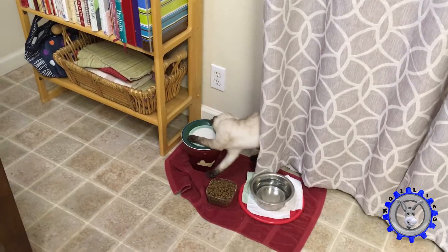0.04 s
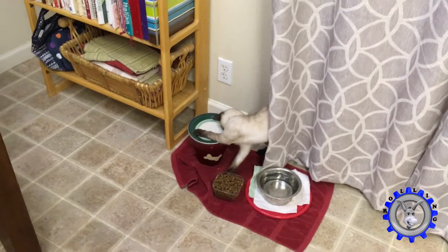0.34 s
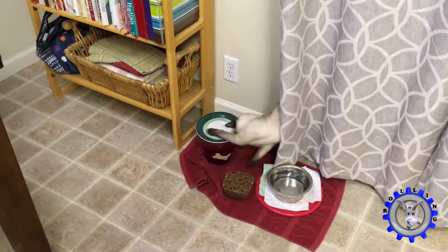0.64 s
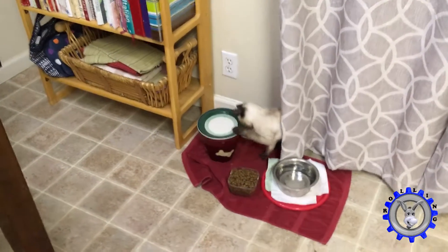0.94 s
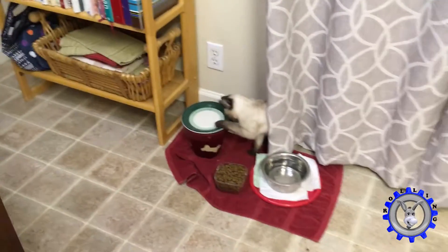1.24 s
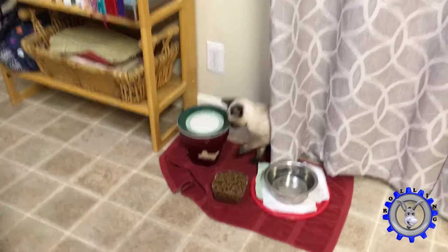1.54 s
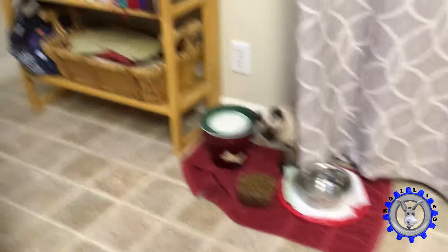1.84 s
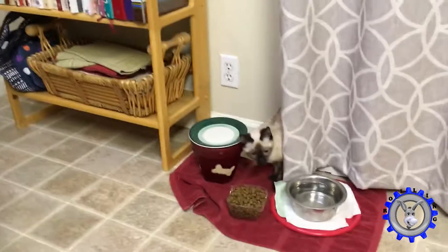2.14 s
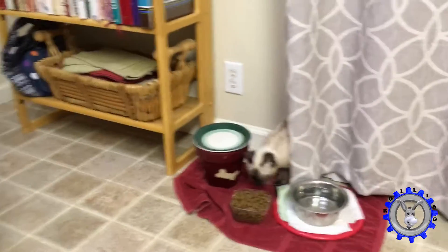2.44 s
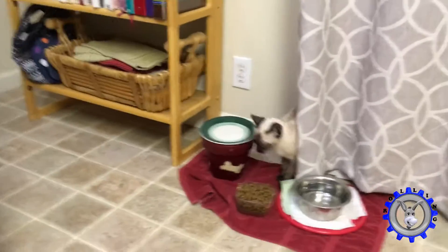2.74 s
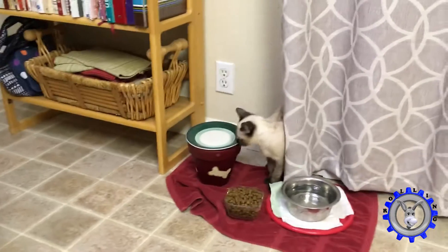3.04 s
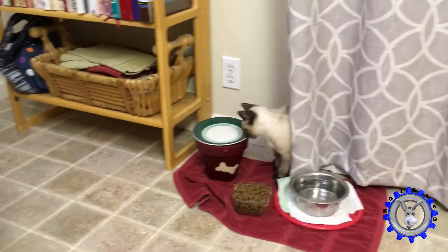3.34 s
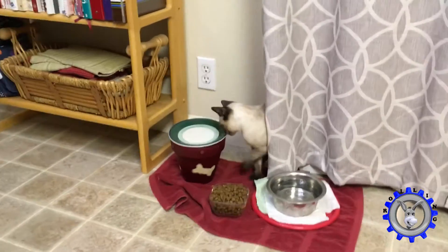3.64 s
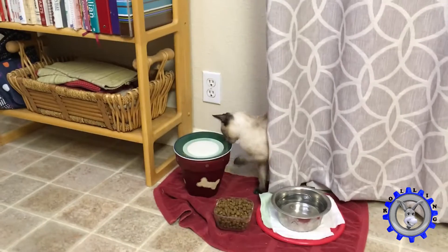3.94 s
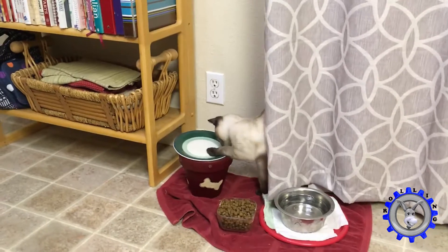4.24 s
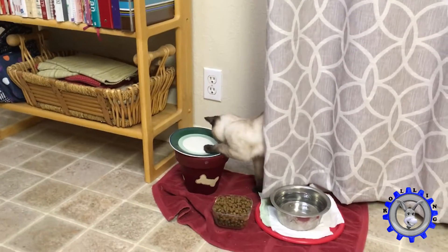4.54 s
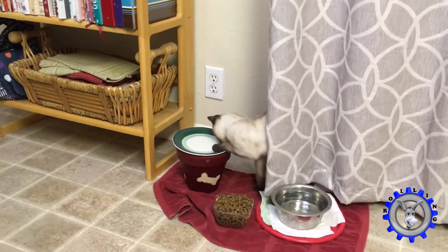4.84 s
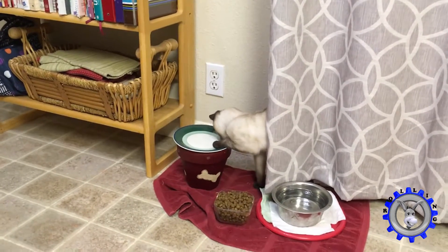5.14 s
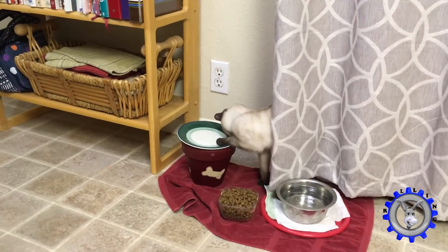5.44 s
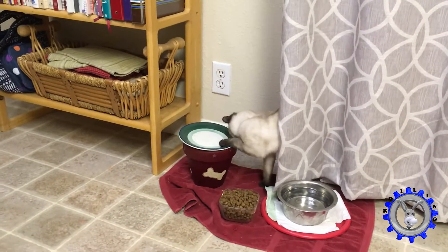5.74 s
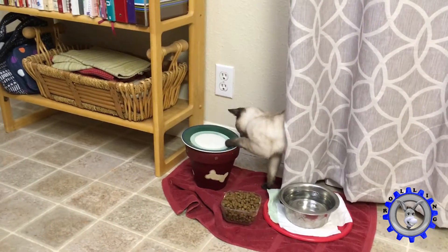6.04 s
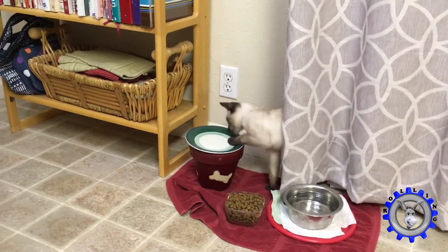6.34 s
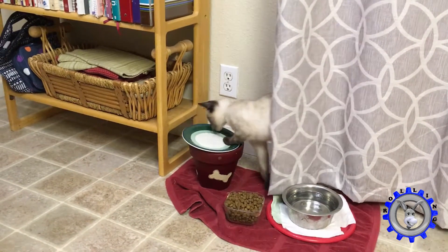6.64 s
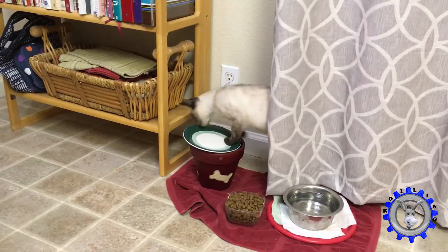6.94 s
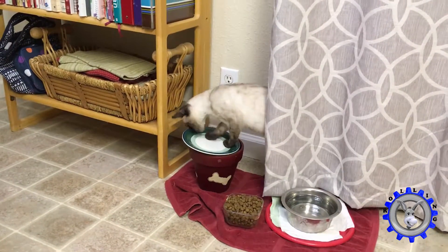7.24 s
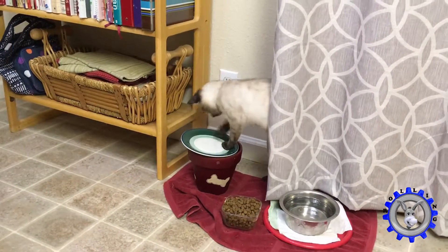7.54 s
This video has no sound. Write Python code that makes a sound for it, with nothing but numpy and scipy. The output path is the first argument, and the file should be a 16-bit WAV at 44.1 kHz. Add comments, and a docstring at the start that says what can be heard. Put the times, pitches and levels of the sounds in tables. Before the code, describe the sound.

In a small room with a hard floor, a motor hums low under a soft rush of air. Straight ahead of the microphone, a kitten nudges a lid against a metal pet bowl with muted taps, brief chatters and light ticks, while faint high squeaks come and go. Midway come two sharp, ringing clanks in quick succession, then further knocks, another clank near the end and a final gentle nudge.

```python
"""A small hard-floored room, the microphone facing a metal pet bowl on a mat. From the start a motor
throbs against the mains hum over a low rush of air and a soft rustle. A kitten paws at the loose lid,
which scuffs and chatters on the rim, with light dry ticks in between. Faint squeaks come and go from
about 2 s. At 4.4, 4.7 and 6.7 s the lid slips free and clangs on the rim, rocking the bowl and
wobbling to rest. One soft nudge follows near the end."""
import sys
import numpy as np
from scipy import signal
from scipy.fft import rfft, irfft, next_fast_len
from scipy.io import wavfile

SR = 44100
rng = np.random.default_rng(int(sys.argv[2]) if len(sys.argv) > 2 else 0)


def output_pcm(signal):
    """Save a mono or channel-first signal as 16-bit PCM at the path in sys.argv[1].

    Samples are clipped to [-1, 1] before scaling.
    """
    pcm = np.clip(np.atleast_2d(signal).T, -1, 1) * 32767
    wavfile.write(sys.argv[1], SR, np.round(pcm).astype(np.int16))


N = 343980
TIME = np.arange(N) / SR
RING_TIME = np.arange(SR // 2) / SR

# Low rush of air in the room. Each row: frequency in Hz, relative spectral level in dB.
RUSH_COLOUR = [(22, -32), (45, -8.5), (70, -4.5), (110, -0.5), (180, 0), (280, 0.5), (380, -4.5),
               (480, -6.5), (700, -18.5), (1200, -60.5)]
# Slow drift of the rush. Each row: time in seconds, level in dB.
RUSH_LEVEL = [(0, -49.5), (1.2, -51.5), (2, -51.5), (4, -53), (6, -51.5), (7.8, -53)]
# Thin hiss of the air. Each row: frequency in Hz, relative spectral level in dB.
HISS_COLOUR = [(290, -6), (500, -3), (1010, -3), (1070, -5), (3020, -17), (3340, -24), (5370, -21),
               (15600, -56)]
# Soft rustle. Each row: frequency in Hz, relative spectral level in dB.
RUSTLE_COLOUR = [(300, -8), (900, 8), (2000, 1), (4000, -1), (7000, -3.5), (10000, -6), (15500, -9)]
# The rustle is strongest as the kitten draws back behind the curtain, then steady.
# Each row: time in seconds, relative level in dB.
RUSTLE_LEVEL = [(0.0, -68.5), (0.42, -71), (0.78, -67), (1.27, -68), (1.68, -64), (2.22, -62.5),
                (2.43, -65.5), (4.2, -71)]
# Tones of the hum. Each row: frequency in Hz, level in dB.
HUM_TONES = [(59.1, -58), (75.1, -64), (137.94, -63), (150.2, -51), (165.98, -68), (240.02, -68),
             (257.92, -65), (262.78, -66), (300.44, -56)]
# The throb grows along the room's standing wave. Each row: time in seconds, motor level in dB.
THROB_LEVEL = [(0, -52), (1, -51), (1.5, -48), (2.5, -48), (3.5, -46), (7.8, -47)]
# The paw nudges the lid against the rim. Each row: start in seconds, strength in dB,
# chatter length in seconds, treble in dB, weight of the paw from 0 to 1.
NUDGES = [(.001, -23, .012, -8, 0.93), (.069, -28, .006, -9, 0.86), (.595, -37, 0.0057, -2, 1),
          (.829, -27.5, .0015, -24, 1), (1.591, -27.5, .0011, -33, 0.65), (2.200, -28.5, .0013, -13, 0.97),
          (3.305, -25.5, 0.0039, -19, 0.73), (3.322, -20, 0.012, -16, 0.77), (3.700, -33, 0.017, -6, 1),
          (4.284, -23, 0.0038, -17, 0.76), (4.367, -17.5, .002, -2.5, 0.9), (4.382, -10, .002, -1.5, 0.98),
          (4.39, -12.5, 0.0086, 3, 0.57), (4.660, -28.5, 0.022, 1, 0.8), (4.980, -31.5, .008, -20, 0.7),
          (5.534, -28, .04, -14, 0.8), (5.575, -22.5, 0.0076, -13, 0.62),
          (5.585, -11.5, .0026, -10.5, 0.83), (6.040, -19, .008, -18, 0.78), (6.05, -19, 0.0029, -30, .15),
          (6.062, -17, 0.0063, -16, 0.14), (6.265, -30, .015, -21, 0.86), (6.356, -28, .001, -23, 1),
          (6.556, -26.5, .015, -7, 1), (6.590, -21, .004, -9.5, 1), (6.677, -15, .008, -7.5, 0.93),
          (7.518, -33.5, .02, -16, 1)]
# The lid slips free and drops on the rim. Each row: start in seconds, strength in dB,
# chatter length in seconds, treble in dB, last wobble in dB below the drop.
DROPS = [(4.398, -.5, .007, -1.5, 19), (4.690, -4, .002, -1.5, 13), (6.6995, -6.5, .0016, 1.5, 31)]
# The clack, a crowd of quickly damped modes. Each row: frequency in Hz, relative spectral level in dB.
CLACK_COLOUR = [(50, -40), (150, -7), (350, -5.5), (600, -3.5), (800, -4), (1050, -9), (1400, -3.5),
                (1900, 0), (2850, -3), (3300, -4.5), (4100, -9.5), (4550, -1), (5000, -19.5), (6350, -0.5),
                (7100, -14), (8000, -19), (15500, -26)]
# Ring of lid and rim. Each row: frequency in Hz, relative level in dB, seconds to fall 60 dB.
LID_MODES = [(1229, -11, .16), (1425, -11, .22), (1676, -6, .18), (1741, -3, .16), (1797, -6, .16),
             (2046, -16, .18), (2230, -7.5, .22), (2725, -2, .18), (2779, 7.5, .17), (2835, 1, .17),
             (3135, -8, .2), (3592, -7, .22), (3788, -8, .22), (3930, -13, .2), (4445, -6, .2),
             (4580, -3.5, .25), (4790, -11, .15), (5915, -4, .18), (6300, -1, .2), (6440, -3, .2),
             (6570, -4, .2), (7385, -7, .21), (8530, -5, .17), (8642, -1, .18), (8860, -4, .18),
             (9690, -13, .2), (10950, -4, .18), (11230, -13, .18), (11742, -12, .17), (13650, -14, .12),
             (14580, -14, .12)]
# Low ring of the bowl. Each row: frequency in Hz, relative level in dB, seconds to fall 60 dB.
BOWL_MODES = [(184, -5, 0.075), (313, -3.5, 0.18), (347.6, -0.5, 0.24), (373, 1, 0.22), (411.4, -8, 0.08)]
# A resting paw damps the ring and shifts the contact to where other modes answer.
# Each row: frequency in Hz, gain in dB under the paw's full weight.
PAW_COLOUR = [(1200, 3.5), (1450, 0), (1720, -1), (2050, -4), (2250, 0.5), (2700, -10.5), (2830, -16),
              (3200, -25), (4000, -17), (4400, -8), (4600, -4), (5000, -15), (6300, -10), (8600, -6)]
# Reverberation of the room. Each row: frequency in Hz, seconds to fall 60 dB.
ROOM_DECAY = [(150, 0.18), (500, 0.52), (2000, 0.36), (5000, 0.33), (10000, 0.27), (16000, 0.27)]
# Dry ticks. Each row: start in seconds, relative level in dB, scratch length in seconds.
TICKS = [(.070, -22, .005), (.188, -21.5, 0.0086), (.455, -14, 0.0097), (.588, -14, 0.021),
         (.821, -14, 0.06), (.963, -14.5, 0.021), (1.198, -12.5, 0.0047), (1.853, -16, 0.025),
         (2.081, -12, 0.03), (2.329, -13.5, 0.042), (2.468, -15, 0.013), (2.686, -15.5, 0.035),
         (2.984, -14, 0.014), (3.392, -10.5, 0.011), (4.656, -19, 0.045), (5.120, -13.5, 0.036),
         (5.144, -9, 0.011), (5.52, -7.5, 0.039), (6.218, -18.5, .011), (7.515, -22, 0.022)]
# Spectrum of a tick before its tilt. Each row: frequency in Hz, relative spectral level in dB.
TICK_COLOUR = [(300, -21), (1000, 0), (2200, 5.5), (4000, 3), (6500, 3), (10000, -0.5), (13000, -4.5),
               (15500, -3.5)]
# Faint squeaks. Each row: start in seconds, length in seconds, lowest tone in Hz, relative level in dB.
SQUEAKS = [(1.87, 0.11, 6900, -70), (1.999, .26, 5320, -64), (3.578, 0.24, 5220, -67.5),
           (3.828, 0.14, 5200, -69), (4.034, 0.054, 8150, -68), (6.3, 0.07, 5330, -69),
           (6.417, 0.22, 5250, -66)]
# Tones of a squeak. Each row: Hz above the lowest, relative level in dB.
SQUEAK_TONES = [(0, 4.5), (440, 0), (940, 4)]


def gain_of(db):
    """Decibels to amplitude."""
    return 10 ** (np.asarray(db) / 20)


def unit(x):
    """Scales to an energy of one."""
    return x / np.sqrt(np.sum(x ** 2) + 1e-20)


def read(points, hz):
    """Reads a curve on a log-frequency axis."""
    point_hz, value = np.transpose(points)
    return np.interp(np.log(hz + 1), np.log(point_hz), value)


def level(curve):
    """Turns rows of seconds and dB into a gain for every sample."""
    return gain_of(np.interp(TIME, *np.transpose(curve)))


def add(mix, start_s, sound):
    """Mixes a sound in at its start time."""
    part = mix[max(round(start_s * SR), 0):][:len(sound)]
    part += sound[:len(part)]


def noise(colour, size):
    """Noise of rms one with the given spectrum."""
    hz = np.fft.rfftfreq(size, 1 / SR)
    phases = np.exp(2j * np.pi * rng.random(len(hz)))
    return unit(irfft(gain_of(read(colour, hz)) * phases, size)) * np.sqrt(size)


def wander(rate_hz):
    """Random drift of rms one, mostly slower than rate_hz."""
    return noise([(rate_hz, 0), (2 * rate_hz, -30), (4 * rate_hz, -120)], N)


def decay(t60):
    """Exponential decay, 60 dB down after t60 seconds."""
    return np.exp(-np.log(1000) * RING_TIME / t60)


def coloured(x, db, size):
    """Filters a short sound by a gain for each frequency."""
    return irfft(rfft(x, size) * gain_of(db), size)[:len(x)]


def air(hiss_db=-60.5):
    """Room tone: a low rush of air under a thin hiss."""
    return level(RUSH_LEVEL) * noise(RUSH_COLOUR, N) + gain_of(hiss_db) * noise(HISS_COLOUR, N)


def hum(motor_hz=112.66, mains_hz=120.02, mains_db=-6, peak_s=0.06, waver=0.4):
    """Faintly wavering tones; a motor and the mains beat against each other."""
    tones = sum(gain_of(db) * np.cos(2 * np.pi * (hz * TIME + rng.random())) for hz, db in HUM_TONES)
    motor = np.exp(2j * np.pi * (motor_hz * TIME + rng.random()))
    beat = 1 + gain_of(mains_db) * np.exp(2j * np.pi * (mains_hz - motor_hz) * (TIME - peak_s))
    throb = level(THROB_LEVEL) * (motor * beat).real
    return np.sqrt(2) * (tones * (1 + waver * wander(rate_hz=2.54)) + throb)


def rustle(gain_db=5, flutter_db=1):
    """Soft, fluttering noise that swells as the kitten draws back."""
    swell = level(RUSTLE_LEVEL) * noise(RUSTLE_COLOUR, N)
    return swell * gain_of(gain_db + flutter_db * wander(rate_hz=12))


def contacts():
    """Every touch of lid and rim: one for a nudge, four for a drop."""
    # Each row: start in seconds, strength in dB, chatter in seconds, treble in dB, paw weight,
    # ring gain in dB, thud gain in dB.
    for nudge in NUDGES:
        yield *nudge, 2, 2.5
    for start, db, chatter_s, treble_db, wobble_db in DROPS:
        yield start, db, chatter_s, treble_db, 0, -3.5, -5.5  # the lid lands
        yield start + 0.006, db - 5, 0.0071, treble_db, 0, -3.5, -5.5  # it rebounds
        yield start + 0.024, db - 13, 0.018, -5, 0, -4, 10.5  # the bowl rocks back on the mat
        yield start + 0.092, db - wobble_db, 0.028, -6.5, 0, -4, -3  # the lid wobbles to rest


def chatter(sound, length_s, rebound=0.61, hits_per_s=800):
    """A first hit and a quick run of mostly smaller ones, each setting off the sound."""
    hits = np.zeros(SR // 10)
    when, strength = rng.random(64), rng.standard_normal(64)
    count = int(np.clip(length_s * hits_per_s, 1, len(when)))
    at = np.clip(when[:count] * length_s * SR, 1, len(hits) - 1).astype(int)
    hits[at] = rebound * strength[:count]
    hits[0] = 1
    return unit(signal.fftconvolve(sound, hits))


def metal_ring(modes, flat_hz, rise_s, jostle_hz, spread_db):
    """Damped sines that swell through the chatter; the shifting contact jostles their pitch."""
    hz, db, t60 = np.transpose(modes)[:, :, None]
    t, step = RING_TIME, SR // 500
    jostle = np.repeat(rng.standard_normal((len(hz), len(t) // step + 1)), step, 1)[:, :len(t)]
    turns = rng.random(hz.shape) + np.cumsum(hz - flat_hz + jostle_hz * jostle, 1) / SR
    waves = np.sin(2 * np.pi * turns) * decay(t60)
    weight = gain_of(db + spread_db * rng.standard_normal(db.shape))  # set by the place of contact
    return unit(weight[:, 0] @ waves * (1 - np.exp(-t / rise_s)))


def lid(gain_db=9, clack_db=-6, bowl_db=-10, clack_t60=0.04, treble_hz=4800, paw_flat_hz=25):
    """Each blow sets off a clack, a ring and a thud of the bowl; a resting paw lowers the pitch."""
    clacks, rings = np.zeros((2, N))
    size = next_fast_len(len(RING_TIME) + SR // 8)
    hz = np.fft.rfftfreq(size, 1 / SR)
    treble_slope = np.log2(1 + (hz / treble_hz) ** 6) / 4
    for start, db, chatter_s, treble_db, paw, ring_db, thud_db in contacts():
        clack = chatter(noise(CLACK_COLOUR, len(RING_TIME)) * decay(clack_t60), chatter_s)
        flat_hz, rise_s = paw * paw_flat_hz, chatter_s / 2
        ring = metal_ring(LID_MODES, flat_hz, rise_s, jostle_hz=34.6, spread_db=0.4)
        thud = metal_ring(BOWL_MODES, flat_hz, rise_s + 0.004, jostle_hz=30.2, spread_db=2)
        contact_db = db + treble_db * treble_slope  # a soft contact leaves the high modes quiet
        add(clacks, start, coloured(clack, contact_db + clack_db, size))
        add(rings, start, coloured(ring, contact_db + ring_db + paw * read(PAW_COLOUR, hz), size))
        add(rings, start, gain_of(db + thud_db + bowl_db) * thud)
    return gain_of(gain_db) * clacks, gain_of(gain_db) * rings


def room(sound, build_s=0.0044, echoes_per_s=4000):
    """Reflections crowd in from the near floor and walls; the low mids linger longest."""
    echoes = rng.standard_normal(len(RING_TIME)) * (rng.random(len(RING_TIME)) < echoes_per_s / SR)
    hz, t, bands = signal.stft(echoes * (1 - np.exp(-RING_TIME / build_s)), SR, nperseg=256)
    fade = np.exp(-np.log(1000) * t / read(ROOM_DECAY, hz)[:, None])
    tail = signal.istft(bands * fade, SR)[1]
    return signal.fftconvolve(sound, unit(tail))[:N]


def faint_ticks(length_s, count=8, lowest_db=-24, range_db=2):
    """Rows for small random ticks, most likely where the rustle is strong."""
    chance = np.cumsum(level(RUSTLE_LEVEL) ** 4)
    when, strength = rng.random((count, 2)).T
    starts = np.interp(when, chance / chance[-1], TIME)
    return [(start, db, length_s) for start, db in zip(starts, lowest_db + range_db * strength)]


def ticks(gain_db=-11, typical_s=0.012, wash_t60=0.3, pivot_hz=5000):
    """Grainy scratches with no ring of their own, each with a short wash of reflections."""
    out = np.zeros(N)
    hz, colour_db = np.transpose(TICK_COLOUR)
    grain_times = RING_TIME[::40]
    for start, db, length_s in list(TICKS) + faint_ticks(typical_s):
        db_per_octave = -0.56 - 1.35 * np.log2(length_s / typical_s)  # a longer scratch is duller
        colour = np.transpose([hz, colour_db + db_per_octave * np.log2(hz / pivot_hz)])
        grains = gain_of(4.5 * np.interp(RING_TIME, grain_times, rng.standard_normal(len(grain_times))))
        power = unit(grains * np.sqrt(RING_TIME) * np.exp(-(RING_TIME / length_s) ** 2)) ** 2
        wash = abs(signal.fftconvolve(power, unit(decay(wash_t60)) ** 2)[:len(power)])
        add(out, start, gain_of(db) * noise(colour, len(power)) * np.sqrt(power + wash))
    return gain_of(gain_db) * out


def squeaks(gain_db=-7, sag_hz=50, jitter_hz=40, flutter_db=4):
    """Thin, unsteady tones that sag a little and break up."""
    out = np.zeros(N)
    for above_hz, tone_db in SQUEAK_TONES:
        jitter = jitter_hz * wander(rate_hz=280)
        flutter = gain_of(flutter_db * wander(rate_hz=45))
        for start, length_s, hz, db in SQUEAKS:
            at = np.flatnonzero((TIME > start) & (TIME < start + length_s))
            progress = np.linspace(0, 1, len(at))
            pitch_hz = hz + above_hz - sag_hz * progress + jitter[at]
            envelope = flutter[at] * np.sqrt(abs(np.sin(np.pi * progress)))
            out[at] += gain_of(db + tone_db) * envelope * np.sin(2 * np.pi * np.cumsum(pitch_hz) / SR)
    return gain_of(gain_db) * out


def scene(clack_wet_db=-1, ring_wet_db=-11, lean_db=0.02):
    """Everything reaches the microphone from nearly straight ahead, the bowl a shade to the right."""
    clacks, rings = lid()
    bowl = clacks + rings + room(gain_of(clack_wet_db) * clacks + gain_of(ring_wet_db) * rings)
    centre = ticks() + squeaks() + hum() + rustle() + air()
    return np.array([bowl * gain_of(-lean_db) + centre, bowl * gain_of(lean_db) + centre])


def record(dry):
    """The recorder cuts off steeply at 15.74 kHz."""
    lowpass = signal.firwin(511, 15740, window=("kaiser", 9), fs=SR)
    return signal.oaconvolve(dry, lowpass[None], "same")


dry = scene()
out = record(dry)
output_pcm(out)
```